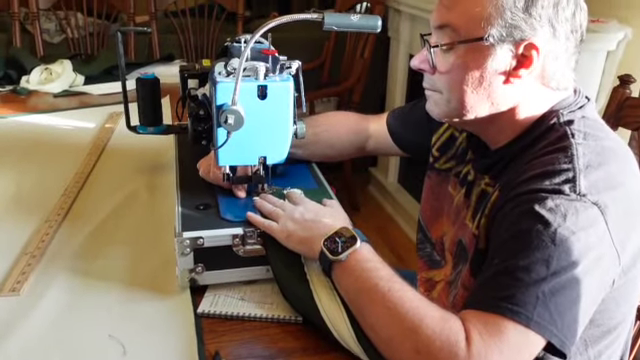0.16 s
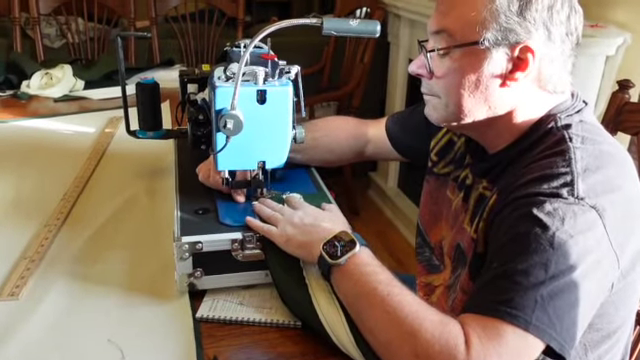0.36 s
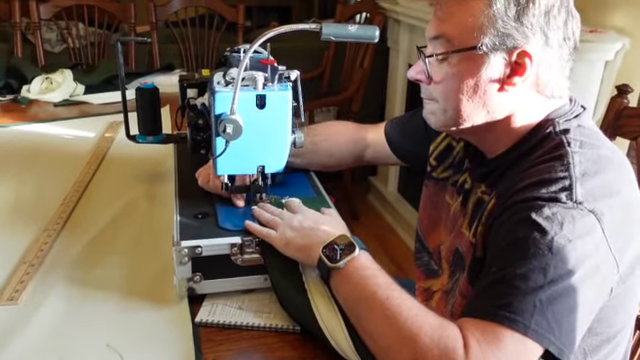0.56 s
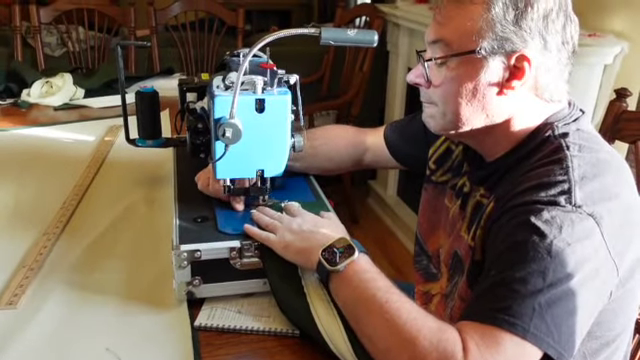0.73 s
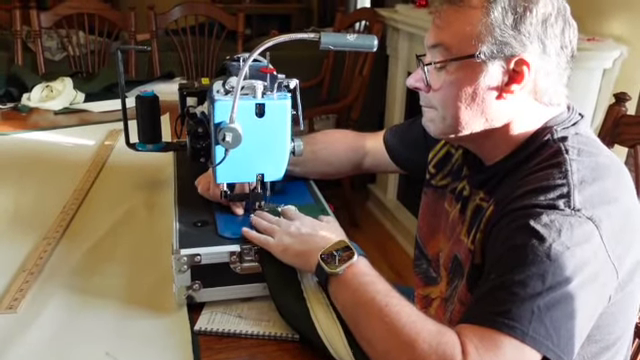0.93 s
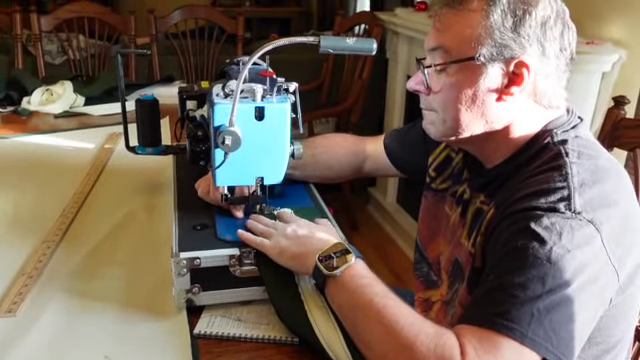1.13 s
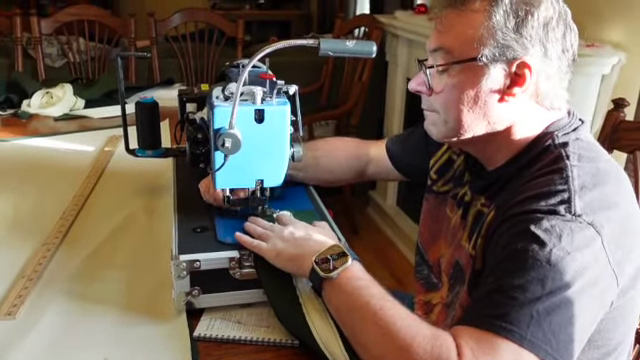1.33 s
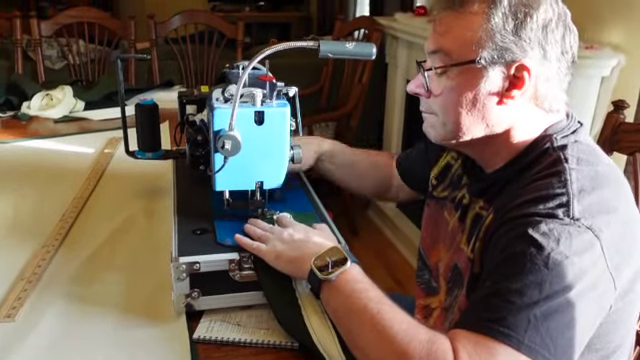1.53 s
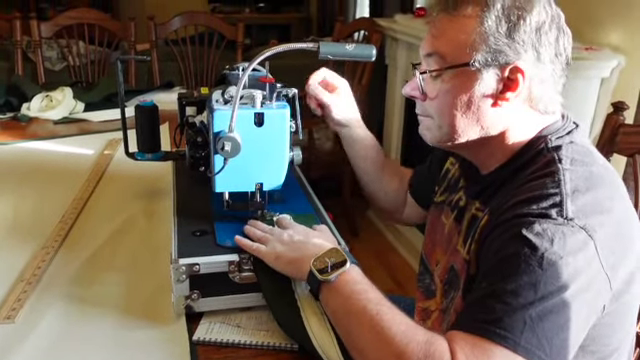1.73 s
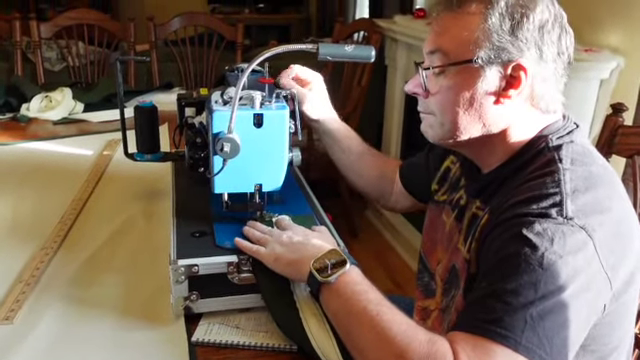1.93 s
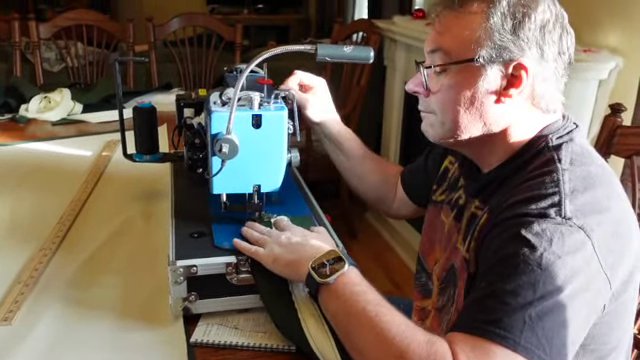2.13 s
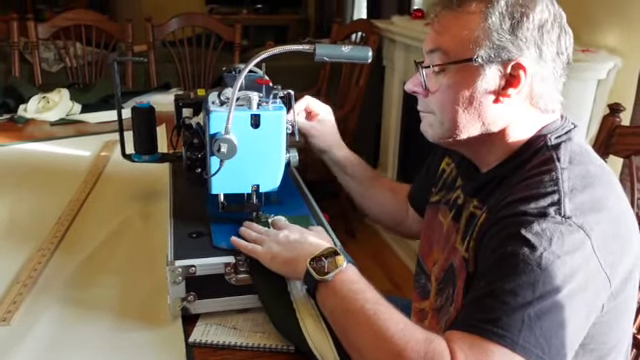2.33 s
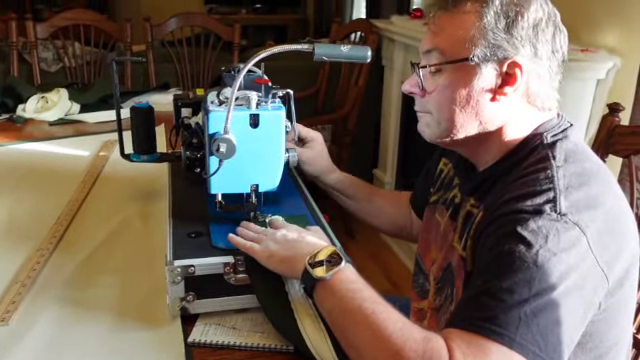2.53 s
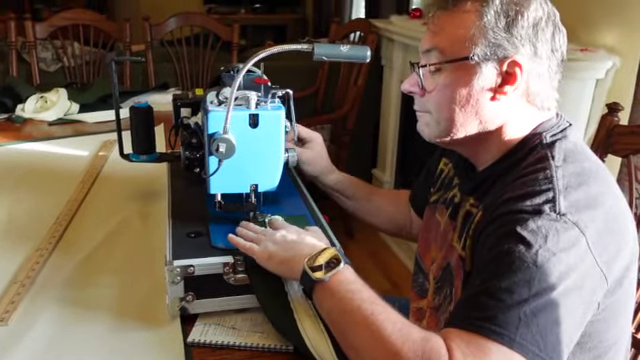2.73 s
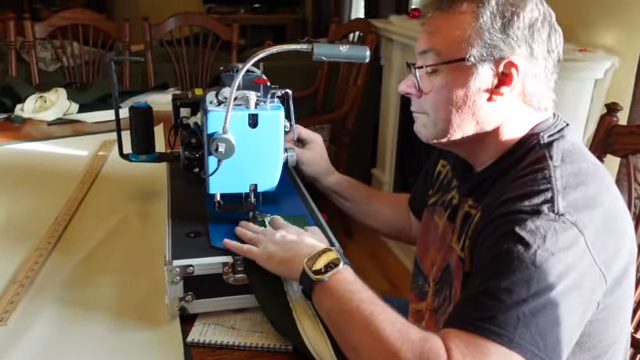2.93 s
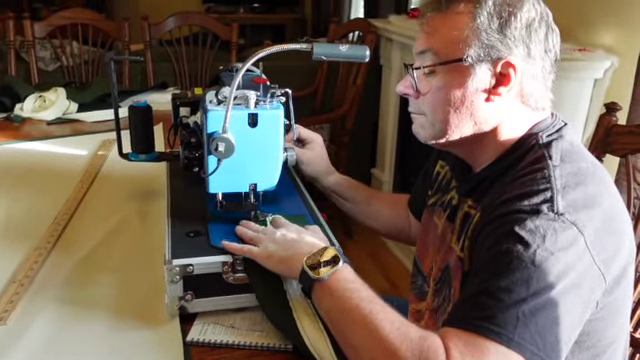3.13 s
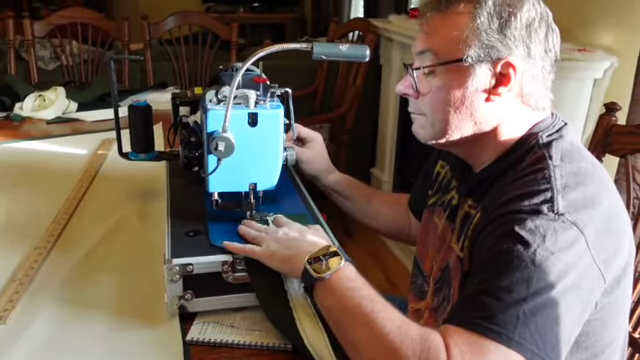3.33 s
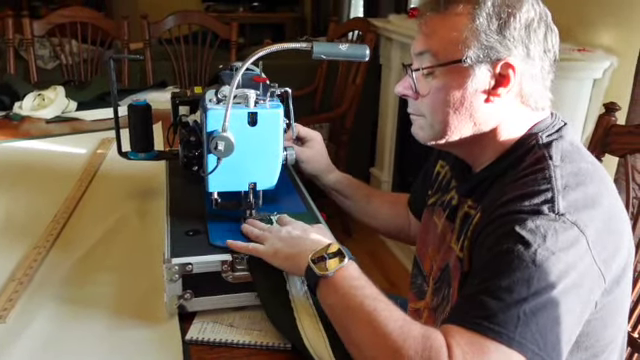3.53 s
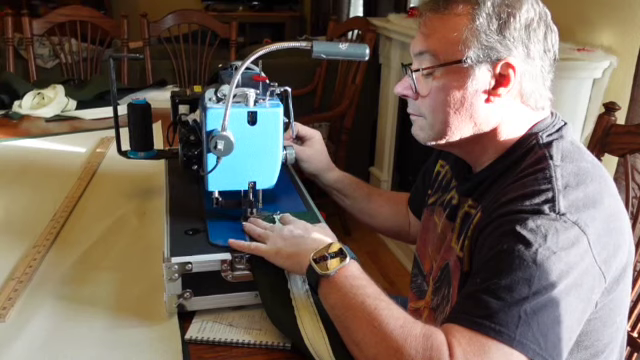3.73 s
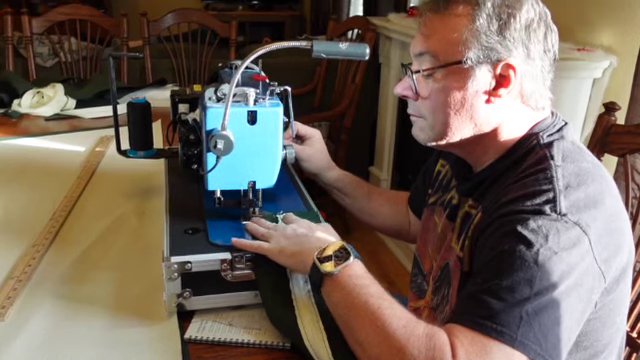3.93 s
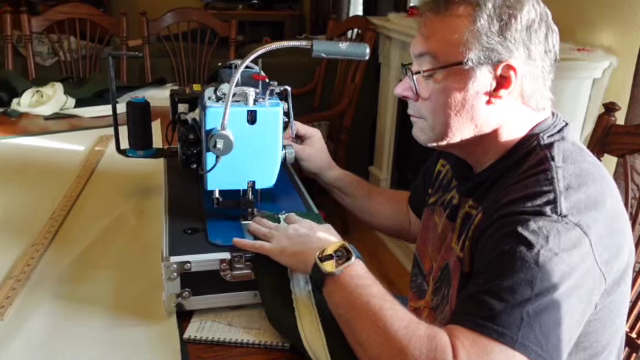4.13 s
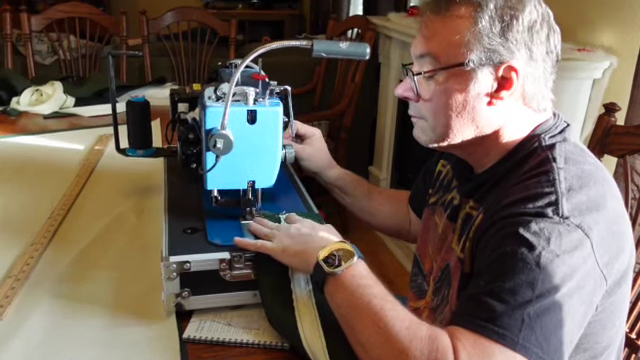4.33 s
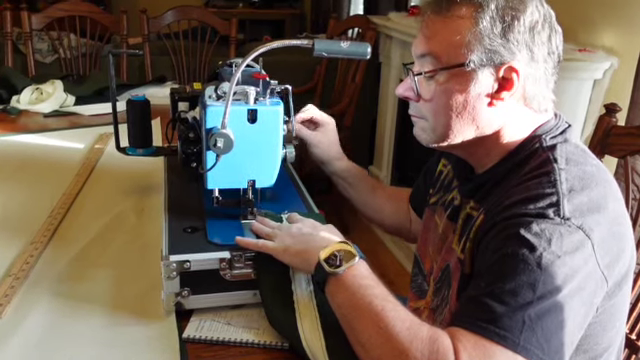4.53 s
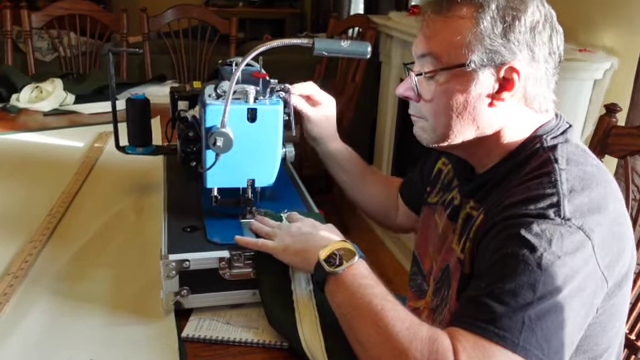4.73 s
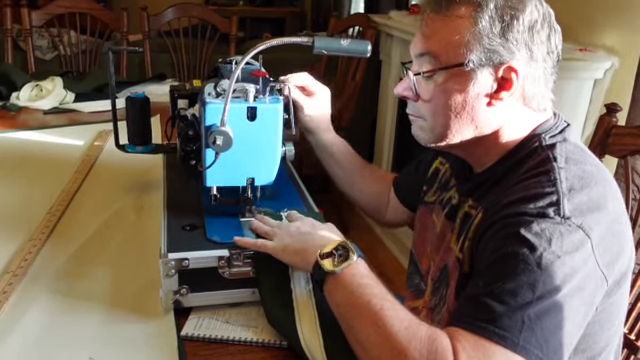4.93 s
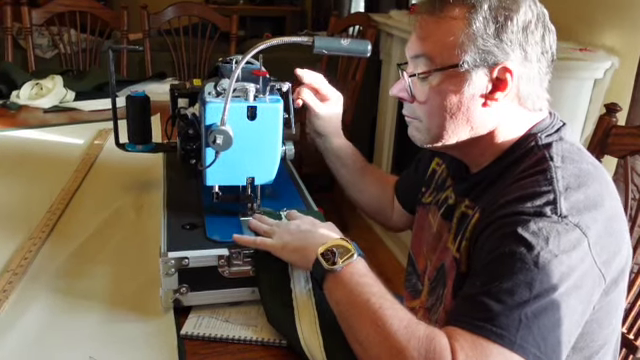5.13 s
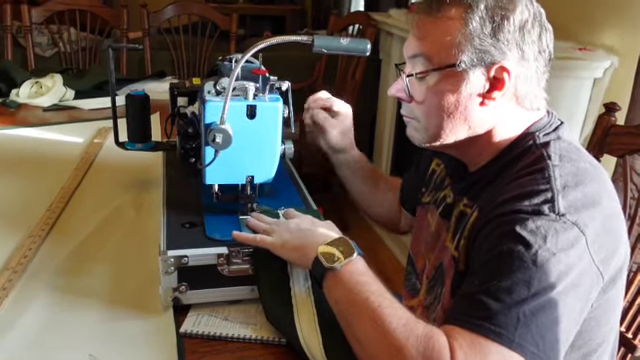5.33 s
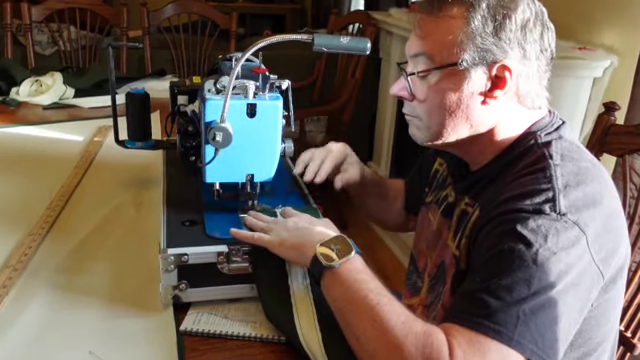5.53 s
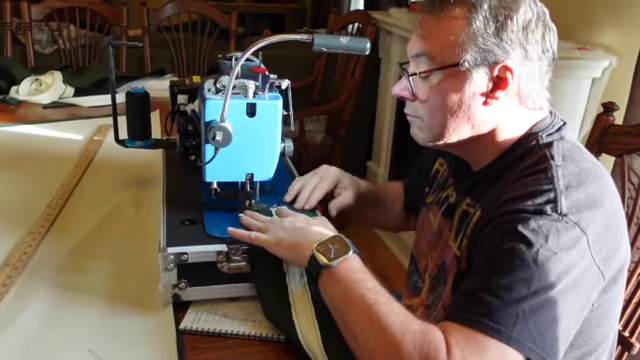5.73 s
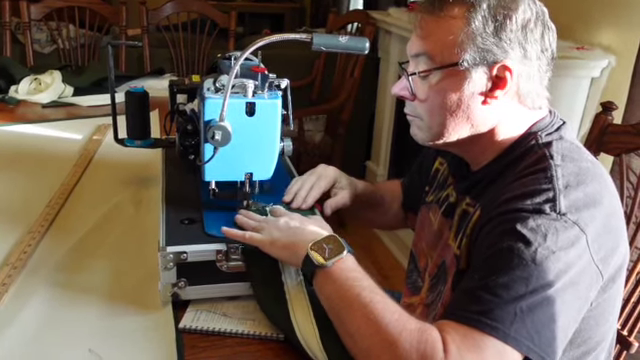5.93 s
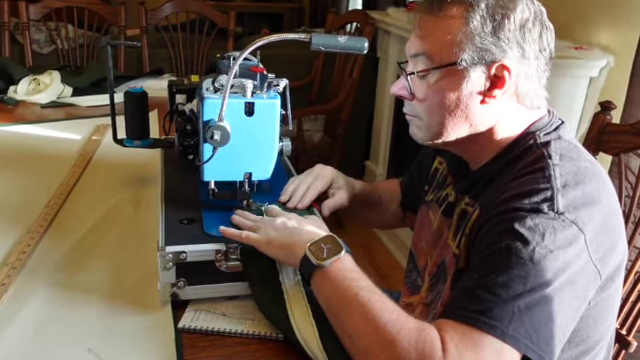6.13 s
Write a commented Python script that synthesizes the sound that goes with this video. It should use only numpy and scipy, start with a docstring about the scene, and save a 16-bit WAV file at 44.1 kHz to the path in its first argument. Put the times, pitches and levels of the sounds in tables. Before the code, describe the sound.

Buzzing sewing machine motor rises, thumps out stitches, stops for cloth handling and a sharp lever snap, then stitches again, faster and longer.

```python
"""Portable sewing machine, two runs

A portable electric sewing machine on a hard case stitches heavy cloth in two runs in a furnished room.
Mains-chopped current buzzes in ringing motor housing, a two-partial whine follows the shaft speed, and
random contacts rattle the gear casting. Needle bar and hook tick and thump through struck modes and noise.
In the pause come small taps, a low creak and the clack of a lever, over household hiss and rumble."""
import sys
import numpy as np
from scipy import signal
from scipy.fft import rfft, irfft, next_fast_len
from scipy.io import wavfile

SR = 44100
rng = np.random.default_rng(int(sys.argv[2]) if len(sys.argv) > 2 else 0)


def dump_mix(stems):
    """Bounce the given channels to the path in sys.argv[1] as a 16-bit WAV at rate SR."""
    frames = np.atleast_2d(stems).T  # one column per channel
    limited = np.clip(frames, -1, 1)  # hard clip at full scale
    pcm = np.round(limited * 32767).astype(np.int16)
    wavfile.write(sys.argv[1], SR, pcm)


def nominal_scale(level):
    """Amplitude ratio for a level in decibels (scalar or array-like)."""
    x = np.asarray(level, float) / 20
    return 10 ** x


N = 276507


def rms_one(x):
    """Scale to unit rms."""
    return x / np.sqrt(np.mean(x ** 2) + 1e-20)


def noise():
    """White noise for the whole scene."""
    return rng.standard_normal(N)


def in_time(tables, quiet):
    """Curve columns at every sample; those from index quiet on are dB and fall silent between tables."""
    rows = []
    for table in tables:
        first, last = list(table[0]), list(table[-1])
        silence = [-110] * (len(first) - quiet)
        rows += [[first[0] - .008] + first[1:quiet] + silence]
        rows += list(table)
        rows += [[last[0] + .05] + last[1:quiet] + silence]
    s, *columns = np.transpose(rows)
    return [np.interp(np.arange(N) / SR, s, c) for c in columns]


def colour(x, spectrum):
    """Shape x by a (f/Hz, level/dB) spectrum, interpolated over log frequency."""
    size = next_fast_len(N)
    hz, db = np.transpose(spectrum)
    bins_hz = np.arange(size // 2 + 1) * SR / size
    gain = nominal_scale(np.interp(np.log(bins_hz + 1), np.log(hz), db))
    return irfft(rfft(x, size) * gain, size)[:N]


def drift(rate_hz):
    """Slow random wander of unit rms: noise through two equal poles at rate_hz, made at SR / 40."""
    r = np.exp(-80 * np.pi * rate_hz / SR)
    slow = signal.lfilter([1], [1, -2 * r, r * r], rng.standard_normal(N // 40 + 2002))[2000:]
    return np.interp(np.arange(N) / 40, np.arange(len(slow)), rms_one(slow))


def resonance(x, hz, width_hz):
    """Two-pole band with about unit gain on top."""
    r = np.exp(-np.pi * width_hz / SR)
    poles = [1, -2 * r * np.cos(2 * np.pi * hz / SR), r * r]
    return signal.lfilter([(1 - r * r) / 2, 0, (r * r - 1) / 2], poles, x)


def ringing_body(x, body):
    """Sum of body resonances, each two bands in series, the second twice as wide."""
    out = np.zeros(N)
    for hz, width_hz, db in body:
        band = resonance(resonance(x, hz, width_hz), hz, 2 * width_hz)
        out += nominal_scale(db) * rms_one(band)
    return out


def strike(times, db_per_mode, modes, scatter_db):
    """Each blow rings every mode with its own luck in strength and sign; db_per_mode(hz) sets blow levels."""
    at = np.round(np.asarray(times) * SR).astype(int)
    out = np.zeros(N)
    luck = rng.standard_normal((len(at), len(modes), 2))
    for k, (hz, db, t60_s) in enumerate(modes):
        clicks = np.full(N, 1e-18)
        strength = nominal_scale(db_per_mode(hz) + db + scatter_db * luck[:, k, 0])
        clicks[at] = strength * np.sign(luck[:, k, 1])
        r = nominal_scale(-60 / (t60_s * SR))
        w = 2 * np.pi * hz / SR
        out += signal.lfilter([0, np.sin(w)], [1, -2 * r * np.cos(w), r * r], clicks)
    return out


def puffs(times, db, tail_s):
    """Noise-burst envelope: sudden start, exponential tail falling 60 dB in tail_s (at least 3 ms)."""
    out = np.zeros(N)
    for s, level_db, tail in np.broadcast(times, db, tail_s):
        tail = max(tail, .003)
        start = round(s * SR)
        t = np.arange(min(int(tail * SR), N - start)) / SR
        out[start:][:len(t)] += nominal_scale(level_db - 60 * t / tail)
    return out


def grains(per_s, spread_db):
    """Random contacts of uneven size."""
    sizes = nominal_scale(spread_db * np.minimum(rng.exponential(1, N), 5)) * rng.choice([-1, 1], N)
    return sizes * (rng.random(N) < per_s / SR)


# household hiss spectrum: (f/Hz, level/dB)
HOUSEHOLD_HISS = [(26, -13), (45, 4.5), (48, -12), (70, -16), (129, -7.5), (202, -19.5), (245, -12),
                  (271, -20), (355, -19), (640, -25.5), (1370, -28), (1480, -31.5), (4680, -41.5),
                  (16000, -58)]
# steady household tones: (f/Hz, level/dB)
APPLIANCE_TONES = [(75.4, -49), (119.6, -51)]
# mains overtones heard in the pause: (t/s, second partial level/dB, third partial level/dB)
OVERTONES = [(1.5, -38, -58), (1.85, -56, -72), (1.95, -60, -64), (2.3, -59, -59), (2.4, -64, -53),
             (2.8, -57, -51), (2.9, -73, -60)]
# swells of the deep rumble: (t/s, level/dB)
RUMBLE_SWELLS = [(.02, -26), (.54, -28.5), (2.09, -34), (2.32, -32.5), (2.76, -31), (3.21, -30),
                 (3.44, -33), (4.66, -23), (5.38, -32)]
RUMBLE_DB, SWELL_RISE_DB_PER_S, SWELL_FALL_DB_PER_S = -40.5, 128, 31


def background():
    """Household hiss and swelling deep rumble as shaped noise, with a few faint sine tones."""
    t = np.arange(N) / SR
    tones = np.zeros(N)
    for hz, db in APPLIANCE_TONES:
        tones += np.sqrt(2) * nominal_scale(db + 1.1 * drift(3.6)) * np.sin(2 * np.pi * hz * t)
    for k, db in enumerate(in_time([OVERTONES], quiet=1)):
        tones += np.sqrt(2) * nominal_scale(db) * np.sin(2 * np.pi * (k + 2) * APPLIANCE_TONES[1][0] * t)
    rumble = rms_one(colour(noise(), [(5, 8.5), (14, 21.0), (22, -3.5), (45, -15), (70, -51.5)]))
    swells_db = [db - np.maximum(SWELL_RISE_DB_PER_S * (s - t), SWELL_FALL_DB_PER_S * (t - s))
                 for s, db in RUMBLE_SWELLS]
    rumble_db = np.maximum(np.max(swells_db, axis=0), RUMBLE_DB)
    hiss = nominal_scale(-44) * rms_one(colour(noise(), HOUSEHOLD_HISS))
    return hiss + nominal_scale(rumble_db) * rumble + tones


def side_rumble():
    """Deep noise that enters the two channels with opposite sign."""
    spectrum = [(20, 12.0), (50, -7.0), (100, -28), (300, -37), (1000, -56)]
    return nominal_scale(-52.0) * rms_one(colour(noise(), spectrum))


# fingers and cloth on the case: (t/s, level/dB, low-mode level/dB, high-mode level/dB)
TAPS = [(0.004, -35.5, -1.5, -13), (0.044, -35.5, -6, -15), (0.219, -40, -4, -11), (1.88, -27.5, -2, -10.5),
        (1.908, -42, 10.5, -19), (2.037, -33.5, -14, -20), (2.089, -40, -6, -10), (2.134, -31.5, 5.5, -26),
        (2.348, -27, -3.5, -16.5), (2.39, -40.5, 10, -6), (2.463, -37, 12.5, -15), (2.858, -45.5, 9.5, -3)]
# modes of the hard case: (f/Hz, level/dB, t60/s)
CASE_MODES = [(201.5, -3.5, 0.14), (286, -1, 0.079), (408.4, -1, 0.065), (660, -4.5, 0.019),
              (840, -6, 0.035), (1050, -5, 0.0095), (1249, -3.5, 0.029), (1980, -7, 0.013), (2230, 2, 0.02),
              (3020, -4, 0.013), (3620, -4.5, 0.0071), (4200, -11, 0.009), (5330, -4, .01)]
# creak glide: (t/s, f/Hz, level/dB)
CREAK = [(2.13, 181, -43), (2.212, 219.4, -36), (2.236, 240.5, -31), (2.374, 233.8, -52), (2.402, 236, -40),
         (2.412, 237, -45), (2.446, 199.5, -40), (2.486, 202, -48), (2.5, 202, -60)]
# hiss spectrum of taps, ticks, thread and hook race: (f/Hz, level/dB)
HISS_SPECTRUM = [(3240, -5.5), (5500, -7), (6010, -8), (7260, -11), (10700, -8.5), (11400, -13),
                 (15200, -19.5), (16000, -50.5)]


def handling():
    """Scuffing taps ring the case modes; a low two-partial creak bends up and back."""
    s, db, low_db, high_db = np.transpose(TAPS)

    def tap_db(hz):
        return db - 15 + (hz < 600) * low_db + (hz > 2000) * (high_db + 9)

    taps = strike(s, tap_db, CASE_MODES, scatter_db=3.0)
    # each touch is a short rub, not one click
    scuff = rng.standard_normal(SR // 40) * np.hanning(SR // 40) ** 2
    scuff *= nominal_scale(8.5) / np.linalg.norm(scuff)
    rubbed = signal.fftconvolve(taps, scuff)[SR // 90:][:N]
    crack = rms_one(colour(noise(), HISS_SPECTRUM)) * puffs(s, db + high_db - 10, 0.044)
    hz, creak_db = in_time([CREAK], quiet=2)
    phase = 2 * np.pi * np.cumsum(hz) / SR
    creak = np.sqrt(2) * nominal_scale(creak_db) * (np.sin(phase) + nominal_scale(-22) * np.sin(2 * phase))
    return rubbed + crack + creak


def room(x):
    """Dense reflections start after a few milliseconds and die away, dulled by soft furnishings."""
    t60_s, wall_cut_hz = 0.37, 7000
    t = np.arange(SR // 2) / SR
    onset = np.clip(t / 0.0094 - .3, 0, 1)
    echoes = rng.standard_normal(len(t)) * nominal_scale(-60 * t / t60_s) * onset
    echoes = signal.lfilter(*signal.butter(1, wall_cut_hz, fs=SR), echoes)
    return signal.fftconvolve(x, echoes / np.linalg.norm(echoes))[:N]


# Steady-layer laws, one layer each: (base level/dB, dB per dB of effort, dB per dB of motor current,
# dB per dB of shaft speed, swell level/dB as the needle enters)
BUZZ_LAW = (-26.5, 0.6, 0.94, -0.2, 2.5)
RATTLE_LAW = (-20.5, 1.26, 0.11, -0.17, 1.5)
DRONE_LAW = (-25.5, 1.01, 0.06, -0.39, 1.5)
HISS_LAW = (-37.5, 0.4, 0.13, 1.5, 3.5)
SONG_LAW = (-31, 0.48, 0.67, -0.25, -2.6)
FIRST_PARTIAL_LAW = (-25.5, 1.9, -0.3, 2, -2)
SECOND_PARTIAL_LAW = (-24.5, 1.8, 0, .6, 0)
# the needle enters the cloth, once a turn: (t/s)
STITCHES = [.25, .63, .985, 1.27, 1.6, 2.67, 3.19, 3.42, 3.67, 3.89, 4.17, 4.61, 5.385, 5.67, 5.93, 6.165,
            6.41]
CRUISE_HZ = 800   # shaft whine pitch at which the speed term is zero


def layer_db(law, speed_hz, effort_db, current_db):
    """Level of a steady layer from effort, current and speed, swelling once a turn."""
    base_db, per_effort, per_current, per_speed, swell_db = law
    turn = np.interp(np.arange(N) / SR, STITCHES, np.arange(len(STITCHES)))
    swell = np.exp(-.5 * ((turn - np.round(turn)) / 0.064) ** 2)   # width in turns
    idle_db = np.where(effort_db < -100, -100, 0)
    speed_db = 20 * np.log10(speed_hz / CRUISE_HZ)
    driven_db = per_effort * effort_db + per_current * current_db + per_speed * speed_db
    return base_db + driven_db + swell_db * swell + idle_db


# motor housing resonances: (f/Hz, width/Hz, level/dB)
HOUSING = [(1087, 140, -3.5), (2079, 84, -8), (2156.5, 79, -1.5)]
# brush holder resonances: (f/Hz, width/Hz, level/dB)
BRUSH_HOLDER = [(4172, 150, 1), (4720, 140, -11.5), (4930, 330, -14), (5213, 110, -7)]
# mains lines under load: (multiple of the pulse rate, level/dB)
HUM_LINES = [(1, -24), (2, -7), (3, -13), (6, -9.5), (7, -15), (8, -14.5), (9, -8)]
# case drone spectrum: (f/Hz, level/dB)
DRONE_SPECTRUM = [(120, -17.5), (170, -4), (240, 4.5), (300, 0.5), (420, -9), (600, -41)]
MAINS_PULSE_HZ = 119.85


def motor(buzz_db, drone_db, song_db, hiss_db):
    """Mains half-waves jolt the armature; with brush noise they ring housing and holder over a hum."""
    phase = 2 * np.pi * MAINS_PULSE_HZ * np.arange(N) / SR
    jolt = np.diff(np.floor(phase / (2 * np.pi)), prepend=0)
    brushes = noise() * np.exp(0.15 * np.cos(phase)) * nominal_scale(1.95 * drift(26))
    # even jolts yield to brush noise as the machine hisses louder
    jolt_share = np.clip(.1 - 0.052 * (hiss_db + 48), .03, .6)
    push = np.sqrt(1 - jolt_share) * rms_one(brushes) + np.sqrt(jolt_share) * rms_one(jolt)
    buzz = ringing_body(push, HOUSING)
    song = ringing_body(push, BRUSH_HOLDER)
    hum = np.zeros(N)
    for k, db in HUM_LINES:
        hum += nominal_scale(db + 0.47 * drift(8)) * np.sqrt(2) * np.sin(k * phase + k * k)
    drone = rms_one(colour(noise(), DRONE_SPECTRUM)) * nominal_scale(-4.0)
    return nominal_scale(buzz_db) * buzz + nominal_scale(song_db - 4.5) * song + nominal_scale(drone_db) * (hum + drone)


# body resonance heard by the whine: (f/Hz, level/dB)
WHINE_PATH = [(400, -30), (650, 4), (790, 2), (900, -1), (1000, -1), (1150, 2.5), (1300, -14),
              (1800, -18.5), (2100, 2), (2400, -8)]


def whine(hz, first_db, second_db):
    """Two husky partials on the shaft speed, shaped by the body: pitch wavers, level flutters."""
    phase = 2 * np.pi * np.cumsum(hz * (1 + .006 * drift(30))) / SR
    first = nominal_scale(first_db) * (0.66 + 0.21 * drift(25)) * np.sin(phase)
    second = nominal_scale(second_db) * (0.71 + 0.56 * drift(30)) * np.sin(2 * phase)
    return np.sqrt(2) * colour(first + second, WHINE_PATH)


# spectrum of the gear rattle: (f/Hz, level/dB)
RATTLE_SPECTRUM = [(300, -31), (400, -9.5), (600, -4.5), (770, -3), (1200, -4.5), (1530, -15.5),
                   (2000, -11.5), (2600, -18), (3350, -21), (4200, -16), (5500, -23), (7000, -44),
                   (10000, -45)]
# casting resonances: (f/Hz, width/Hz, level/dB)
CASTING = [(516, 49, -3), (651.6, 83, 2.5), (761.7, 114, 6.5), (880, 51, 2), (991, 91, -5),
           (1194, 58, -8.5)]


def gear_train(rattle_db, hiss_db):
    """Dense tooth and cam contacts ring the casting; thread and hook race hiss above, in clumps."""
    clumps = drift(30)
    teeth = grains(2500, spread_db=0.5)
    contacts = rms_one(colour(teeth, RATTLE_SPECTRUM))
    bright = signal.sosfiltfilt(signal.butter(2, 1400, "high", fs=SR, output="sos"), contacts)
    # duller where the hiss is weak against the rattle, as at low speed
    brightness = nominal_scale(np.clip(.5 * (hiss_db - rattle_db + 15.0), -18, 3))
    ringing = rms_one(ringing_body(teeth, CASTING))
    rattle = 0.72 * (contacts - bright) + 0.3 * ringing + brightness * bright
    rattle = rattle * nominal_scale(rattle_db + 2.03 * clumps)
    hiss = rms_one(colour(grains(5000, spread_db=0.5), HISS_SPECTRUM))
    hiss = hiss * nominal_scale(hiss_db + 1.5 + 1.2 * clumps + 1.1 * drift(40))
    return rattle + hiss


# hook and needle bar contacts: (t/s, level/dB)
TICKS = [(.5208, -38), (0.626, -17), (.679, -32), (.7154, -35), (.7857, -40), (0.8806, -10), (0.98, -14),
         (1.0086, -18), (1.0813, -26), (1.1359, -19), (1.2483, -16), (1.2841, -17), (1.4896, -25.5),
         (1.5617, -27.5), (1.6072, -28), (3.0401, -48), (3.1843, -27), (3.2194, -19), (3.2546, -23),
         (3.2897, -20), (3.371, -17), (3.4377, -15), (3.4971, -14.5), (3.5195, -20), (3.5415, -18),
         (3.6094, -21), (3.6637, -21), (3.7182, -19), (3.7615, -16), (3.8278, -15.5), (3.8838, -18),
         (3.9707, -20), (3.998, -17), (4.0882, -19), (4.249, -21), (4.3356, -24), (4.4828, -24.5),
         (4.5701, -17), (4.5995, -17.5), (4.9075, -25), (5.0974, -32), (5.1818, -29), (5.2716, -27),
         (5.292, -24), (5.347, -17.5), (5.3817, -7), (5.4808, -14.5), (5.519, -17), (5.6451, -20),
         (5.6673, -8), (5.6931, -17), (5.743, -21), (5.7744, -18), (5.8542, -24), (5.8901, -19),
         (5.9854, -23), (6.0166, -19), (6.095, -19), (6.158, -14), (6.2274, -19)]
# tick modes: (f/Hz, level/dB, t60/s)
TICK_MODES = [(3350, -5.5, .012), (4300, -2.5, .012), (5300, -2.5, .01), (6800, -5.5, .008),
              (8900, -4.5, .013), (10600, -1.5, .02), (12800, -3.5, .015), (14800, -5.5, .011)]
# check spring pings: (t/s, level/dB)
PINGS = [(0.6254, -13), (0.7866, -30), (0.975, -21.5), (1.2497, -22), (1.3763, -33), (3.0375, -38),
         (3.519, -13), (4.2916, -35), (4.9067, -30), (5.2718, -12.5), (5.594, -17), (5.8421, -27),
         (5.9943, -27), (6.0841, -24), (6.227, -27)]
# check spring mode: (f/Hz, level/dB, t60/s)
SPRING_MODES = [(3280, 1.5, 0.024)]
# strokes into the cloth: (t/s, level/dB, upper-ring level/dB)
THUMPS = [(.598, -1, -26), (.65, -14.5, 12), (.783, -2, -14), (.882, -10, -14), (0.992, 0.5, -20),
          (1.089, -0.5, -21), (1.169, -3.5, -6), (1.266, -3, -3.5), (1.379, -9.5, 8), (3.043, -9, -21),
          (3.439, 3.5, -14), (3.667, 1.5, -17), (3.69, -2.5, -1), (3.78, -7, 6), (3.884, 0, -33),
          (4.008, -9, -29), (4.189, -3.5, -0.5), (4.597, -4.5, -2), (4.684, -11, 1.5), (5.274, -4.5, -7),
          (5.388, -1.5, -4), (5.681, -5, -6), (5.826, -8, -3), (5.939, -5.5, 6.5), (6.003, -3, 0),
          (6.169, -3, 1)]


def stitching():
    """Metal ticks crack and scrape, a spring pings, dull thumps shake the gears and ring low case modes."""
    s, db = np.transpose(TICKS)
    ticks = strike(s, lambda hz: db - 14 - 3.5 * (hz < 6000), TICK_MODES, scatter_db=4.0)
    # harder contacts are shorter: the tail halves for every 13 dB
    tail_s = np.minimum(0.084 * 2 ** (-(db + 22) / 13), .12)
    crack_and_tail = puffs(s, db - 13, .004) + puffs(s, db - 9.5, tail_s)
    scrape = rms_one(colour(noise(), HISS_SPECTRUM)) * crack_and_tail
    s, ping_db = np.transpose(PINGS)
    pings = strike(s, lambda hz: ping_db, SPRING_MODES, scatter_db=5.5)
    s, thump_db, upper_db = np.transpose(THUMPS)
    thumps = strike(s, lambda hz: thump_db - 15.5 + (hz > 900) * (upper_db + 8.0),
                    CASE_MODES[:7], scatter_db=3.0)
    shaken = rms_one(colour(noise(), RATTLE_SPECTRUM))
    thumps += shaken * puffs(s, thump_db + 0.37 * upper_db - 13.5, 0.1)
    low_cut = signal.butter(2, 140, "high", fs=SR, output="sos")
    return signal.sosfilt(low_cut, ticks + pings + scrape + thumps)


# clack and bounces: (t/s, level/dB)
LEVER_CONTACTS = [(2.5087, -15), (2.5105, -11.5), (2.5129, -7), (2.5149, -7), (2.523, -34), (2.548, -13)]
# lever modes: (f/Hz, level/dB, t60/s)
LEVER_MODES = [(81, -20, 0.65), (190, -8, 0.18), (408, -6, 0.047), (573, -27, 0.1), (700, -10.5, 0.055),
               (970, -12, 0.028), (1280, -7, 0.042), (2514, -12, 0.016), (4020, -22, .02),
               (4730, -16, 0.02)]
# crash spectrum: (f/Hz, level/dB)
LEVER_CRASH = [(59, -34), (100, -38), (219, 2), (736, -14), (1100, -7.5), (2690, -19.5), (3940, -13),
               (7450, -22.5), (14400, -21.5), (16000, -46)]


def lever():
    """The lever snaps home in quick contacts: the main one rings its modes, a broad crash dies away."""
    s, db = np.transpose(LEVER_CONTACTS)
    rings = strike(s[2:3], lambda hz: db[2], LEVER_MODES, scatter_db=0)
    crash = rms_one(colour(noise(), LEVER_CRASH))
    return rings + crash * (puffs(s, db - 2.5, 0.022) + puffs(s[3:4], -19, 0.23))


# the pedal, one curve per run: (t/s, shaft whine f/Hz, gear effort level/dB, motor current level/dB)
PEDAL_RUNS = [
    [(.362, 49.9, -27, -19), (.466, 239, -5.5, -17), (.57, 485, -5.5, -10), (.625, 640, -1.5, -10),
     (.72, 700, 0, -3.5), (.9, 800, 0, -1.5), (1.2, 797, 0.4, 0.7), (1.39, 730, -5.5, -3),
     (1.5, 602, -10, -10), (1.58, 450, -14.5, -28), (1.62, 254, -41, -37), (1.75, 153, -56, -50)],
    [(2.96, 40, -22.5, -18), (3.03, 149.8, -9.5, -16), (3.06, 380.3, -5, -16), (3.17, 603, -2, -6.5),
     (3.25, 660, 2.5, 2), (3.33, 801.6, 1.4, 2.5), (3.5, 982, 1.5, 3), (3.6, 1050, -0.1, 5.5),
     (3.85, 1044, -0.8, 8.5), (3.93, 981, 2.8, -0.5), (4.02, 783.4, -1, -4.5), (4.15, 645.5, -1.5, 3),
     (4.25, 571.6, -1.5, -4), (4.55, 483, -3.5, -5.5), (4.66, 449, -5.5, -4.5), (4.75, 330, -8, -15.5),
     (5.19, 340.2, -5, -10), (5.26, 560, -1.5, -1.5), (5.32, 669.4, 0.6, -2.5), (5.42, 751, -0.5, 2.5),
     (5.56, 810, 1, 2), (5.9, 981, -0.5, 4), (6.27, 970, -0.1, 4.5)],
]


def scene():
    """The pedal drives the steady layers; all reach both channels alike, save some deep rumble."""
    drive = in_time(PEDAL_RUNS, quiet=2)
    speed_hz = drive[0]
    buzz_db, drone_db, song_db = (layer_db(law, *drive) for law in (BUZZ_LAW, DRONE_LAW, SONG_LAW))
    rattle_db, hiss_db = layer_db(RATTLE_LAW, *drive), layer_db(HISS_LAW, *drive)
    first_db, second_db = (layer_db(law, *drive) for law in (FIRST_PARTIAL_LAW, SECOND_PARTIAL_LAW))
    steady = motor(buzz_db, drone_db, song_db, hiss_db)
    steady += whine(speed_hz, first_db, second_db)
    steady += gear_train(rattle_db, hiss_db)
    blows = handling() + stitching() + lever()
    mid = steady + blows + nominal_scale(-7.5) * room(blows) + background()
    side = side_rumble()
    return np.array([mid + side, mid - side])


def top_cut(x):
    """Nothing passes above the cut-off."""
    return signal.sosfilt(signal.butter(12, 16330, fs=SR, output="sos"), x)


def record(dry):
    """Soft saturation rounds the peaks."""
    mix = 1.026 * np.tanh(dry / 0.87)
    return top_cut(mix)


dry = scene()
out = record(dry)
dump_mix(out)
```